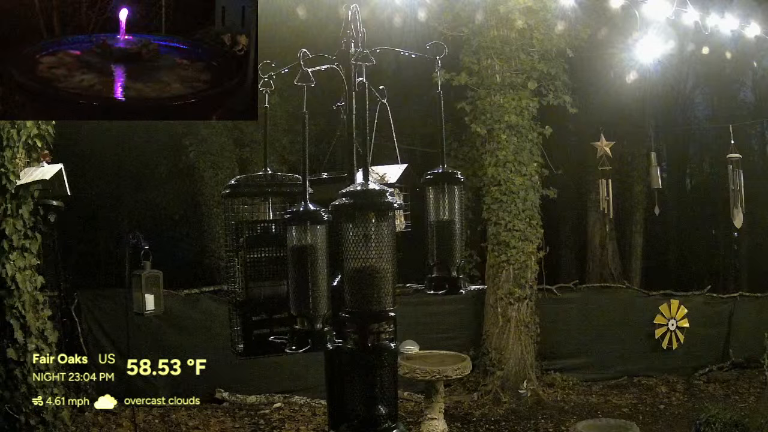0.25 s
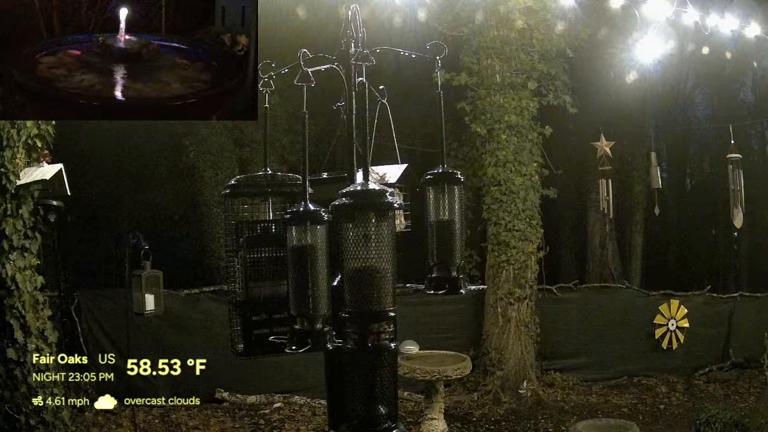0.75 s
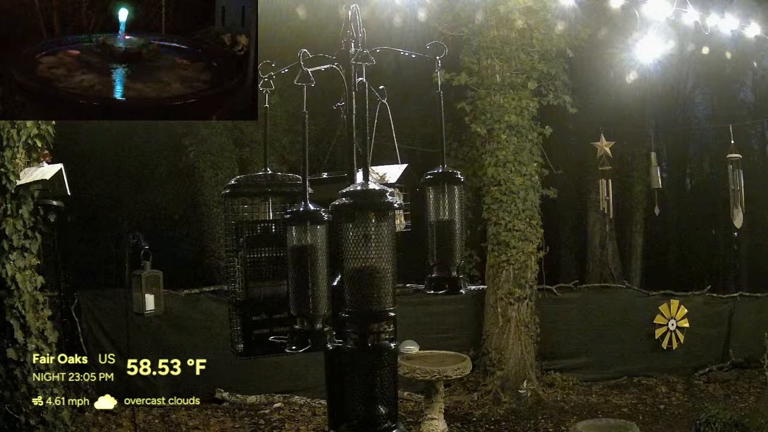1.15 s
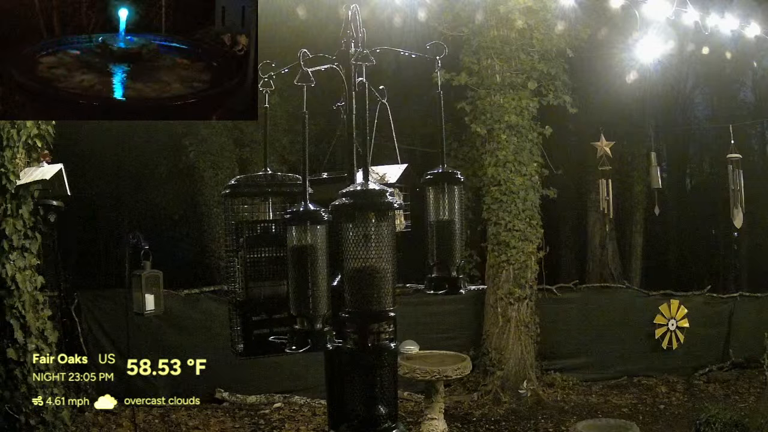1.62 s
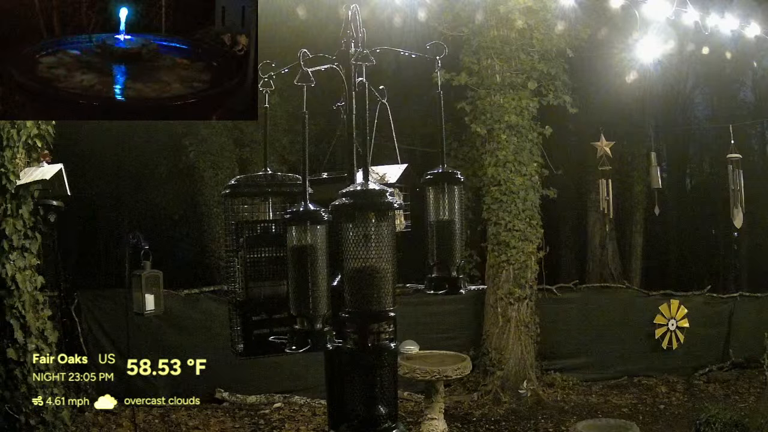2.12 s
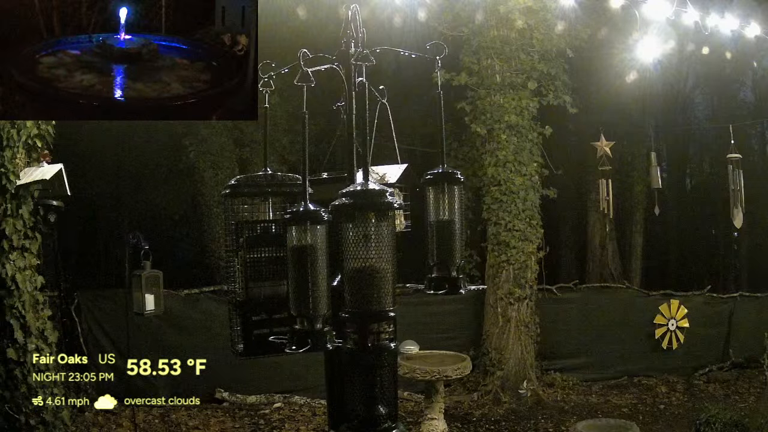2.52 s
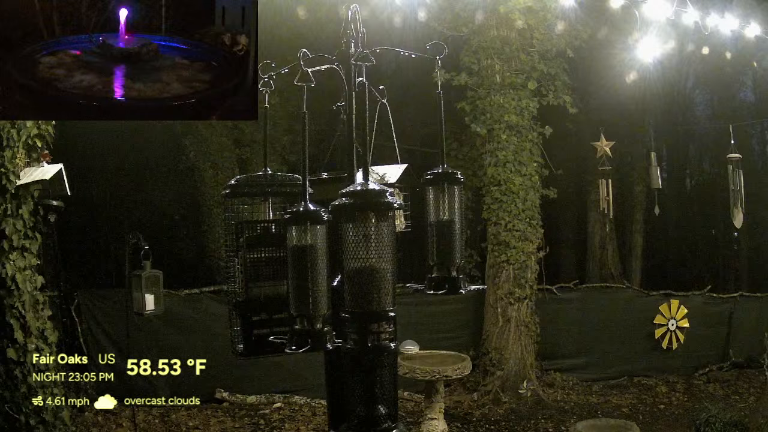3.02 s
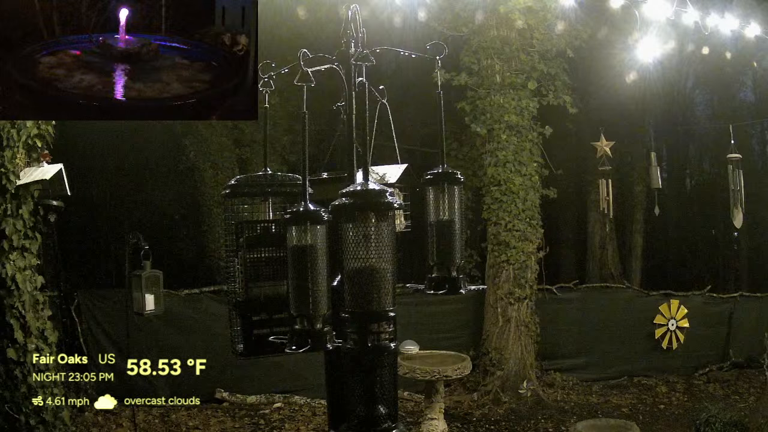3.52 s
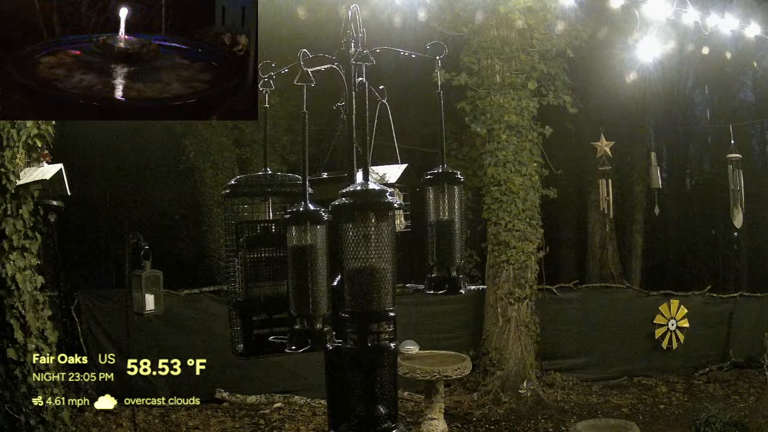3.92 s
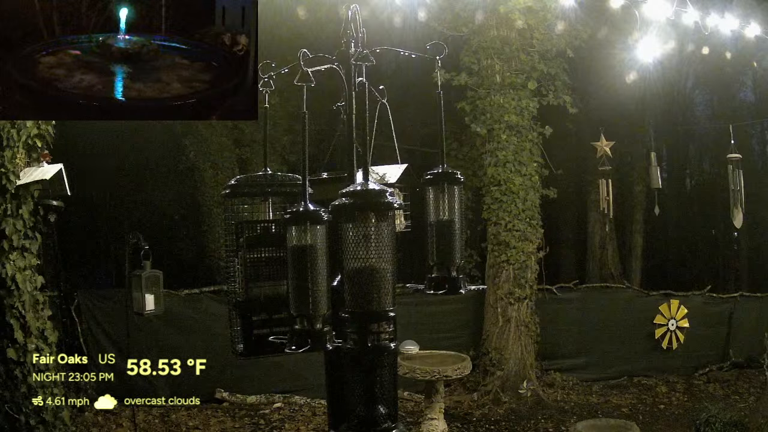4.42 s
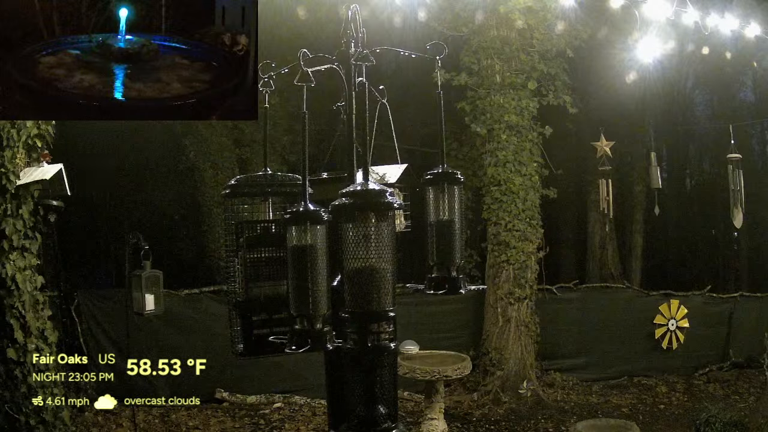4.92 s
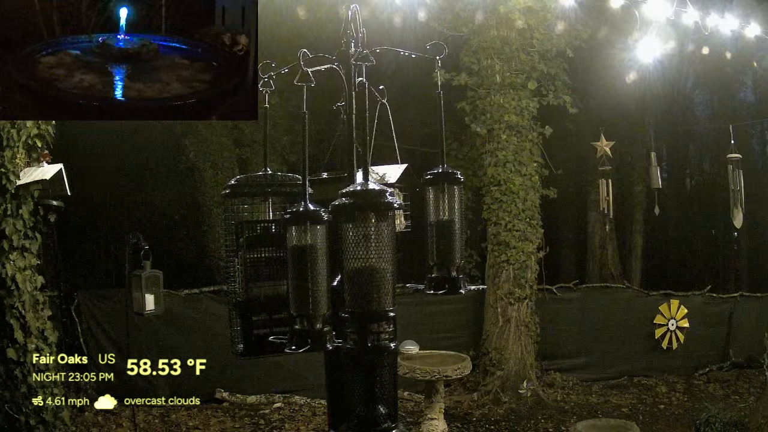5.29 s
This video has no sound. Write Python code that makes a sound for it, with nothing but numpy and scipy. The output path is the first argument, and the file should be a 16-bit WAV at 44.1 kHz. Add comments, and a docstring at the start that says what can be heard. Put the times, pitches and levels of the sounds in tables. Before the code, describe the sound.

A still, damp wooded yard at night, heard from a fixed outdoor microphone. Soft air, a wavering distant low hum and a very faint, thin throbbing high hiss lie underneath. A barely voiced owl note opens at 0 seconds, then seven stronger hoots follow at about 0.25, 0.65, 0.9, 1.5, 1.9, 2.3 and 2.5 seconds. Each is low, hollow and nearly pure, sliding quickly upward, rounding over and falling away, with a little throaty rasp on the slopes. The last lasts longest, sagging in pitch until about 2.8 seconds. Trunks and fence return short, fluttering echoes and a faint tail. Close, small water drips tick throughout, clearest near 1.9, 2.2 and 3.3 seconds, with tiny high pings. From 3.7 seconds sharper snapping drops, dull plops and little sprays become busier, especially around 4.0 and 4.6 to 5.3, continuing until the end at about 5.5 seconds.

```python
"""Owl in a wet yard at night

After one faint call, a barred owl gives seven arched hoots: a nearly pure gliding tone plus a noisy rasp.
Trunks and a fence in the wooded yard send them back as single echoes and scattered tails.
Water drips, ticks and plops nearby: damped tones mixed with short bursts of noise.
Behind it lie shaped noises: soft air, a faint haze, a low distant hum and a thin, throbbing high hiss."""
import sys
import numpy as np
from scipy import signal
from scipy.fft import rfft, irfft
from scipy.io import wavfile
from scipy.ndimage import uniform_filter1d

SR = 44100
rng = np.random.default_rng(int(sys.argv[2]) if len(sys.argv) > 2 else 0)


def output_pcm(signal):
    """Save a mono or channel-first signal as 16-bit PCM at the path in sys.argv[1].

    Samples are clipped to [-1, 1] before scaling.
    """
    pcm = np.clip(np.atleast_2d(signal).T, -1, 1) * 32767
    wavfile.write(sys.argv[1], SR, np.round(pcm).astype(np.int16))


N = 244755
TIME = np.arange(N) / SR

# The hoots: (end of upward slide [s], rise [s], hold [s], fall [s], lowest pitch [Hz], top pitch [Hz],
# closing pitch [Hz], base level [dB], swell over the hold [dB], change at the close [dB],
# base rasp against the voice [dB], share thrown into the trees [dB])
HOOTS = [(.008, 0.021, 0.062, .03, 365, 460.6, 430.2, -37.5, 1, 2, -12.5, -10),
         (0.266, 0.0474, .045, .062, 342.9, 555.8, 512.7, -31, 0.5, -1.5, -6, 1.5),
         (.671, 0.081, 0.019, .032, 300.7, 548, 526, -32, 2, -8, -10, 1),
         (0.894, .095, .046, .06, 322.1, 561.4, 537.6, -33.5, 2, -1.5, -20, -1),
         (1.551, .098, 0.046, .03, 320.2, 562.2, 534.3, -29.5, 0, -13.5, -13.5, -1),
         (1.909, 0.048, .103, .033, 318, 579, 537.5, -31.5, 2.5, -3.5, -14, -5),
         (2.308, 0.057, .038, .033, 334.3, 571.7, 535, -30.5, 2, -13, -9, -1.5),
         (2.528, 0.052, .21, 0.03, 400, 563.2, 495.5, -29.5, -3, -10.5, -20.5, -11.5)]
# Single reflections of the owl's voice: (delay [s], gain before the overall flutter [dB])
ECHOES = [(.0119, -31.5), (.0231, -20.5), (.0517, -19), (.0861, -17.5), (.109, -14.5), (.1412, -24.5),
          (.179, -22), (.201, -28.5)]
# Colour of the rasp in the owl's throat: (frequency [Hz], relative level per Hz [dB])
RASP_COLOUR = [(150, -26.5), (240, -11.5), (340, 2), (500, 11), (650, -1), (820, -6), (1050, -17),
               (1300, -29), (3000, -58.5)]
# The louder drips: (time [s], peak [dB], pitch [Hz], ring time [s], share of splash [0 to 1])
DRIPS = [(0.4437, -50.5, 2430, 0.017, 0.75), (.8322, -54, 2760, 0.045, 0.17),
         (1.2485, -54.5, 2586, 0.024, 0.62), (1.283, -48.5, 2258, 0.016, 0.34),
         (1.68, -50, 2860, .028, 0.95), (1.923, -41, 2850, .011, 0.19), (2.2336, -37, 2520, 0.018, 0.86),
         (2.316, -54, 2670, 0.021, 0.81), (3.0698, -50, 4586, 0.016, 0.19),
         (3.2068, -56, 3580, 0.011, 0.37), (3.292, -51.5, 2780, .04, 0.32),
         (3.3064, -41.5, 2750, 0.014, 0.26), (3.703, -55, 3000, 0.029, 0.6), (3.898, -49.5, 2600, .014, .8),
         (4.288, -53, 3130, 0.043, 0.52), (4.6359, -46.5, 2840, 0.017, 0.39), (4.678, -47, 2680, .02, 0.55),
         (4.858, -43, 2690, 0.022, 0.83), (5.0674, -43.5, 2820, 0.018, 0.54), (5.3434, -56, 3640, .016, .9)]
# The louder tiny bubbles that ping: (time [s], peak before a shared trim [dB], pitch [Hz])
PINGS = [(0.6915, -46, 6700), (.9621, -51, 6540), (1.4892, -55, 6860), (1.681, -55.5, 6750),
         (1.9573, -56, 6516), (2.1213, -53.5, 6400), (2.9439, -52.5, 6520), (3.069, -56, 6750),
         (3.731, -49, 6830), (3.793, -56.5, 6700), (3.9208, -53.5, 6830), (4.8598, -41, 7280)]
# The louder plops: (time [s], peak before a shared trim [dB], pitch [Hz], ring time [s],
# share of splash [0 to 1])
PLOPS = [(0.963, -55, 1410, 0.093, 0.21), (.988, -58.5, 1340, 0.07, 0.1), (1.21, -58, 890, 0.18, 0.68),
         (3.355, -54, 749, 0.28, 0.23), (3.846, -55.5, 1250, 0.16, 0.58), (3.895, -42, 960, 0.057, 0.58),
         (4.038, -47, 1180, 0.036, 0.91), (4.284, -57, 980, .08, 1), (4.38, -53, 1158, .1, .7),
         (4.636, -53.5, 704, .11, 0.47), (4.817, -48, 1286, 0.028, 0.56), (5.005, -50, 1420, .14, 0.52),
         (5.133, -56, 702, 0.3, 0.6), (5.254, -54, 898, 0.096, 0.76)]
# Hard drops that snap, ring and throw a spray: (time [s], snap peak before its band filter [dB],
# pitch [Hz], ring peak [dB], spray level before a shared trim [dB], spray length [s])
SNAPS = [(3.714, -32.5, 2980, -54, -51, 0.016), (4.0374, -41.5, 2286, -41.5, -44.5, 0.016),
         (4.8053, -31, 2690, -46, -56.5, 0.072), (5, -58, 2430, -35, -64.5, .12)]
# The trickle grows busier late on: (time [s], boost [dB])
BUSY = [(3.6, 1), (4.25, 5.5)]
# Colour of the soft air: (frequency [Hz], relative level per Hz [dB])
AIR_COLOUR = [(20, -3), (110, -4.5), (300, -20), (600, -31.5), (950, -28.5), (1150, -27.5), (1370, -24),
              (1600, -30), (2200, -30), (2850, -27), (3500, -37.5), (4100, -40), (5700, -39.5), (6800, -57),
              (7600, -52.5), (8700, -57)]
# Loudness of the far hum before it wavers: (time [s], level [dB])
HUM_LEVEL = [(0.0, -51.5), (0.52, -51.5), (0.55, -44.5), (0.62, -50), (2.02, -52.5), (2.33, -48),
             (3.74, -57.5), (3.77, -53), (4.16, -54), (4.2, -47), (4.51, -54), (4.84, -49), (5.05, -60),
             (5.07, -47.5), (5.35, -53.5), (5.38, -45.5), (5.43, -55.5), (5.55, -48.5)]
# Colour of the far hum: (frequency [Hz], relative level per Hz [dB])
HUM_COLOUR = [(8, -14), (22, 1), (40, -7), (55, 1), (75, -2.5), (95, -5.5), (122, -5.5), (160, -17.5),
              (230, -22.5), (400, -46.5), (2000, -79)]
# Loudness of a faint haze that hangs in the trees: (time [s], level [dB])
HAZE_LEVEL = [(0, -61.5), (1.4, -62), (1.85, -71), (2.42, -62.5), (3.2, -69.5), (4, -72.5), (4.3, -65.5),
              (5.55, -69)]
# Colour of the haze: (frequency [Hz], relative level per Hz [dB])
HAZE_COLOUR = [(150, 1.5), (240, -0.5), (400, -4.5), (650, 0), (930, 0.5), (1150, -7.5), (1400, -8.5),
               (2000, -15), (4000, -43.5)]
# Colour of the high hiss: (frequency [Hz], relative level per Hz [dB])
HISS_COLOUR = [(4500, -48), (6000, -11.5), (6700, 1), (7200, -2.5), (7700, -20), (8800, -38.5)]

# The voice is loudest at the throat's resonance and weakens to either side
THROAT_HZ, BELOW_DB_PER_HZ, ABOVE_DB_PER_HZ = 527.4, 0.24, 0.06
LEAST_DB = -19  # floor for the throat's weakening and the closing change together
OPEN_SHARE = 0.94  # pitch at the end of the rise, as a share of the top pitch
SETTLE_S, SAG_POWER = 0.01082, 3.4  # the pitch settles towards its top, then sags late in the hold
RISE_BOW = 0.8  # under 1: the upward slide is steepest at its start
CUT_S = 0.005  # time the voice takes to change level as the closing slide begins
RASP_OPENING_DB, RASP_CLOSING_DB = 4, -2  # added to the rasp: huskier on the way up than down
SNAP_RING_S, PING_RING_S = 0.031, 0.0087
SPRAY_LAG = 0.11  # the spray peaks this share of its length after the drop
DRIP_SPRAY_DB, DRIP_SPRAY_S = -25.5, 0.049  # a drip's lighter spray, against the drip's peak
SHOWER_S, SHOWER_LENGTH_S, SHOWER_DB = 4.25, 0.1, -61.5  # a small shower, level before the spray's trim
EDGE_HZ = 8800  # upper edge of the whole sound


def amp(db):
    """Turns decibels into gain."""
    return 10 ** (np.asarray(db) / 20)


def unit(x):
    """Scales a signal to an rms of 1."""
    return x / np.sqrt(np.mean(x ** 2) + 1e-20)


def add(mix, s, sound):
    """Mixes a sound in at s seconds."""
    part = mix[max(0, round(s * SR)):][:len(sound)]
    part += sound[:len(part)]


def curve(points):
    """Draws straight lines over time through (time [s], level [dB]) points."""
    return np.interp(TIME, *np.transpose(points))


def noise(points):
    """Makes steady noise coloured by (frequency [Hz], level [dB]) points."""
    hz, db = np.transpose(points)
    bins = np.fft.rfftfreq(N, 1 / SR)
    colour = amp(np.interp(np.log(bins + 1), np.log(hz + 1), db))
    return unit(irfft(rfft(rng.standard_normal(N)) * colour, N))


def wobble(rate):
    """Makes a smooth random drift of rms 1, with up to about rate changes a second."""
    smoothing = np.exp(-(np.fft.rfftfreq(N, 1 / SR) / rate) ** 2)
    return unit(irfft(rfft(rng.standard_normal(N)) * smoothing, N))


def band(x, low_hz, high_hz, order=2):
    """Keeps the sound between two frequencies, using a filter that never looks ahead."""
    edges = [low_hz, min(high_hz, SR / 2 - 1)]
    return signal.sosfilt(signal.butter(order, edges, "band", fs=SR, output="sos"), x)


def scatter(x, t60, delay, per_s=4000):
    """Adds up weak reflections, per_s a second, that fade by 60 dB in t60 seconds."""
    t = TIME[:SR]
    count = int(per_s)
    at = ((np.arange(count) + rng.random(count)) * SR / per_s).astype(int)
    at = np.minimum(at, SR - 1)
    tail = np.zeros(SR)
    tail[at] = rng.choice([-1, 1], len(at))
    # silent until the delay, full strength from twice the delay
    tail *= amp(-60 * t / t60) * np.clip(t / delay - 1, 0, 1)
    return signal.fftconvolve(x, tail / np.linalg.norm(tail))[:N]


def hiss(db=-80, depth=0.26):
    """A thin high noise whose level throbs about twelve times a second."""
    throb = np.cos(2 * np.pi * 11.986 * (TIME - .042))
    return amp(db) * noise(HISS_COLOUR) * (1 + depth * throb)


def night(air_db=-65.5, air_waver_db=0.1, hum_waver_db=0.86):
    """Soft even air and a drifting haze over a low hum that swells and sinks, all shaped noise."""
    air = unit(band(noise(AIR_COLOUR), 220, 16000)) * amp(air_db + air_waver_db * wobble(18))
    haze = noise(HAZE_COLOUR) * amp(curve(HAZE_LEVEL))
    hum = noise(HUM_COLOUR) * amp(curve(HUM_LEVEL) + hum_waver_db * wobble(4.6))
    return air + haze + hum


def drop(peak_db, hz, ring, splash, rise, spread):
    """One drop: a damped tone and a burst of splash, held to a band around its pitch."""
    t = TIME[:6000]
    low_hz, high_hz = hz / spread, hz * spread
    burst = unit(band(rng.standard_normal(len(t)), low_hz, high_hz))
    splash = np.clip(splash, 0, 1)
    sound = (1 - splash) * np.sin(2 * np.pi * hz * t) + splash * burst
    sound *= 1 - np.exp(-t / rise)
    sound *= np.exp(-np.log(1000) * t / max(ring, .002))  # down by 60 dB after the ring time
    sound = band(sound, low_hz, high_hz, order=4)
    return amp(peak_db) * sound / abs(sound).max()


def trickle(low_hz, high_hz, per_s, db, ring, spread_db, count=16):
    """Many small drops at random times and strengths, shared among count pitches."""
    out = np.zeros(N)
    for hz in np.geomspace(low_hz, high_hz, count):
        lands = rng.random(N) < per_s / count / SR
        strength = amp(spread_db * np.minimum(rng.exponential(1, N), 2))
        one = drop(0, hz, ring, splash=0.53, rise=0.009, spread=1.145)
        out += signal.oaconvolve(lands * strength, one)[:N]
    return amp(db) * unit(out)


def spray(hz=2750, grain_db=5.0, spread=1.188, level_db=-4):
    """Snaps and drips throw droplets in brief, grainy swells of noise; one small shower falls by itself."""
    throws = [(s, db, length) for s, _, _, _, db, length in SNAPS]
    throws += [(s, db + DRIP_SPRAY_DB, DRIP_SPRAY_S) for s, db, *_ in DRIPS]
    throws.append((SHOWER_S, SHOWER_DB, SHOWER_LENGTH_S))
    swell = np.zeros(N)
    for s, db, length in throws:
        from_peak = 2 * abs((TIME - s) / length - SPRAY_LAG)
        swell += amp(db) * np.exp(-np.minimum(from_peak, 10) ** 2)
    droplets = unit(band(rng.standard_normal(N), hz / spread, hz * spread, order=4))
    grain = unit(amp(grain_db * wobble(120)))
    return amp(level_db) * swell * droplets * grain


def water(ping_db=1, plop_db=-1, bounce_db=-12, wet_db=-11, snap_top_hz=4000):
    """Drips, snaps, high pings and dull plops, with a bounce off the ground and a short tail."""
    out, snaps = np.zeros((2, N))
    for s, db, hz, ring_db, _, _ in SNAPS:
        add(snaps, s, drop(db, hz, ring=0.016, splash=0.41, rise=.0001, spread=1.87))
        add(out, s, drop(ring_db, hz, SNAP_RING_S, splash=0.37, rise=.0008, spread=1.337))
    out += band(snaps, 770, snap_top_hz, order=8)
    for s, db, hz, ring, splash in DRIPS:
        add(out, s, drop(db, hz, ring, splash, rise=0.0026, spread=1.237))
    for s, db, hz in PINGS:
        add(out, s, drop(db + ping_db, hz, PING_RING_S, splash=0.43, rise=0.00058, spread=1.08))
    for s, db, hz, ring, splash in PLOPS:
        add(out, s, drop(db + plop_db, hz, ring, splash, rise=0.0055, spread=1.31))
    add(out, .0045, amp(bounce_db) * out)
    return out + amp(wet_db) * scatter(out, t60=0.067, delay=0.0064)


def woods(tone, thrown, rasp, near_db=-25, far_db=-29, rasp_wet_db=-2, rasp_dry_db=-4,
          flutter_db=3.5, patchy_db=3):
    """Separate echoes from trunks and fence, a sparse scatter from farther trees and a long faint tail."""
    echo = amp(near_db) * scatter(thrown, t60=1.0, delay=0.013, per_s=40)
    for delay, db in ECHOES:
        add(echo, delay, amp(db) * thrown)
    echo *= unit(amp(flutter_db * wobble(22)))  # the echoes flutter unevenly
    husk = amp(rasp_dry_db) * rasp + amp(rasp_wet_db) * scatter(rasp, t60=1.0, delay=0.0091)
    husk *= unit(amp(patchy_db * wobble(21)))  # the rasp comes in ragged patches
    return tone + echo + husk + amp(far_db) * scatter(tone, t60=2.3, delay=0.019)


def hoot(t, rise, hold, fall, low_hz, top_hz, close_hz, db, swell_db, cut_db):
    """Pitch and level of one hoot: a slide up until t = 0 s, an arch, then a quick slide down."""
    u = np.clip(t / hold, 0, 1)  # progress through the hold
    open_hz = OPEN_SHARE * top_hz
    hz = top_hz - (top_hz - open_hz) * np.exp(-u * hold / SETTLE_S)
    hz -= (top_hz - close_hz) * u ** SAG_POWER
    hz -= (open_hz - low_hz) * (1 - np.clip(1 + t / rise, 0, 1) ** RISE_BOW)
    hz -= (close_hz - low_hz) * np.clip((t - hold) / fall, 0, 1)
    throat_db = np.minimum(BELOW_DB_PER_HZ * (hz - THROAT_HZ), ABOVE_DB_PER_HZ * (THROAT_HZ - hz))
    closing_db = cut_db * np.clip((t - hold) / CUT_S, 0, 1)
    level = amp(db + swell_db * u + np.maximum(throat_db + closing_db, LEAST_DB))
    fade_in = np.minimum((t + rise) / CUT_S / 2, 1)
    return hz, level * fade_in


def owl(jitter=0.015, shimmer=0.069, second_db=-46, taut_hz=545):
    """A nearly pure tone arches up and down; a rasp joins it on the slopes and clears at the top."""
    pitch = np.full(N, float(taut_hz))
    level, husky, thrown = np.zeros((3, N))
    for s, rise, hold, fall, *voice, rasp_db, thrown_db in HOOTS:
        on = (TIME >= s - rise) & (TIME < s + hold + fall)
        pitch[on], level[on] = hoot(TIME[on] - s, rise, hold, fall, *voice)
        lean_db = np.interp(TIME[on], [s, s + hold], [RASP_OPENING_DB, RASP_CLOSING_DB])
        husky[on] = amp(rasp_db + lean_db)
        thrown[on] = amp(thrown_db)
    # round off the corners over about 6 ms
    pitch, level, husky, thrown = uniform_filter1d([pitch, level, husky, thrown], size=260)
    slack = np.clip((taut_hz - pitch) / 40, .3, 2.5)  # a slack membrane swings unevenly
    phase = 2 * np.pi * np.cumsum(pitch * (1 + jitter * slack * wobble(120))) / SR
    tone = np.sqrt(2) * (np.sin(phase) + amp(second_db) * np.sin(2 * phase))
    tone *= level * (1 + shimmer * slack * wobble(49))
    rasp = level * husky * slack * noise(RASP_COLOUR)
    return tone, thrown * tone, rasp


def scene():
    """The night air, the water and the owl among the trees, added together."""
    background = hiss() + night()
    patter = trickle(1900, 3300, per_s=32, db=-84, ring=0.017, spread_db=4, count=10)
    fizz = trickle(6400, 7000, per_s=110, db=-82.0, ring=0.013, spread_db=11.5, count=6)
    crackle = trickle(3500, 4500, per_s=4.5, db=-91, ring=0.012, spread_db=2.5, count=4)
    gurgle = trickle(680, 1400, per_s=18, db=-82.5, ring=0.099, spread_db=4.5, count=10)
    small_drops = amp(curve(BUSY)) * (patter + gurgle) + crackle + fizz
    return (background + small_drops + spray() + water() + woods(*owl()))[None]


def record(dry):
    """Removes the treble above the upper edge with a steep low-pass filter."""
    low_pass = signal.firwin(401, EDGE_HZ, window=("kaiser", 8), fs=SR)
    return signal.oaconvolve(dry, low_pass[None], "same")


dry = scene()
out = record(dry)
output_pcm(out)
```